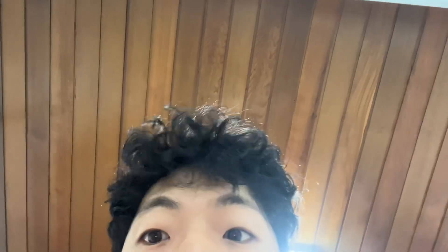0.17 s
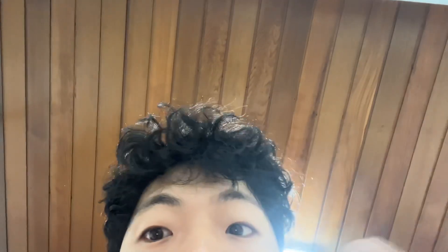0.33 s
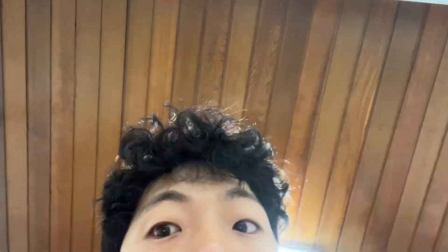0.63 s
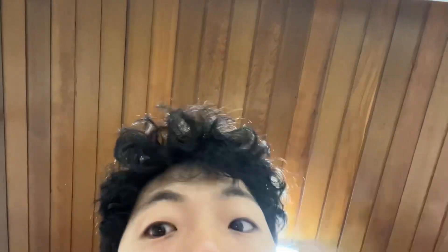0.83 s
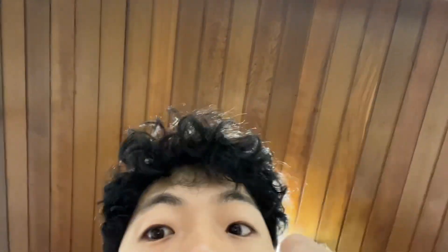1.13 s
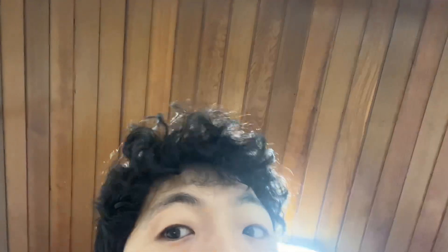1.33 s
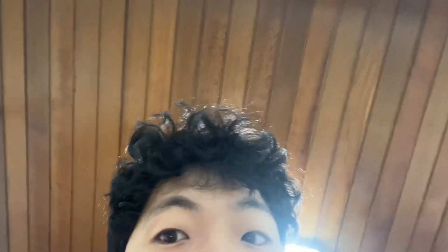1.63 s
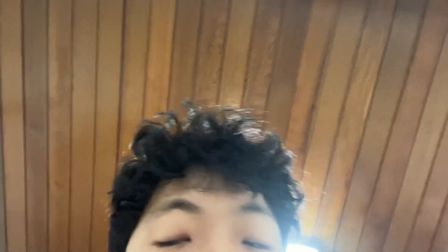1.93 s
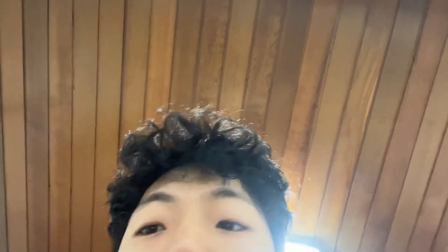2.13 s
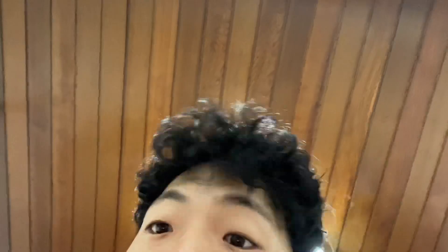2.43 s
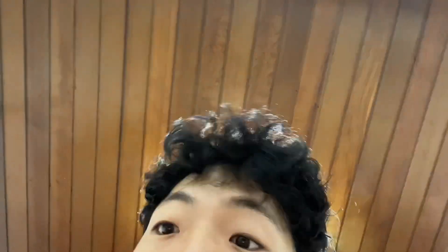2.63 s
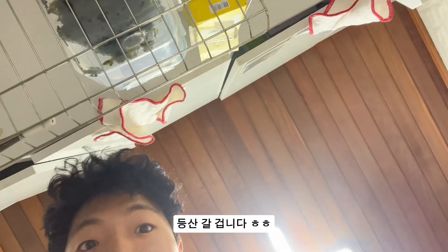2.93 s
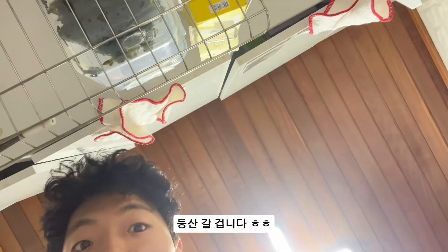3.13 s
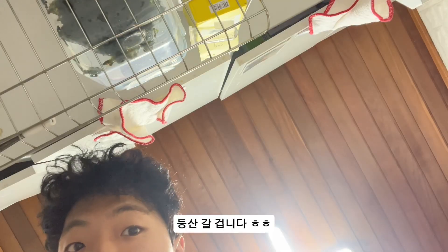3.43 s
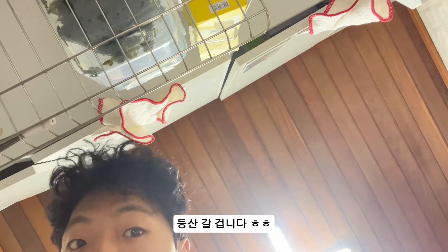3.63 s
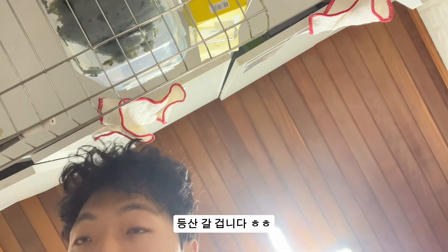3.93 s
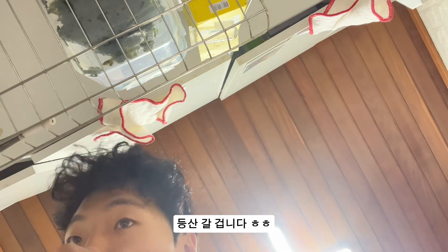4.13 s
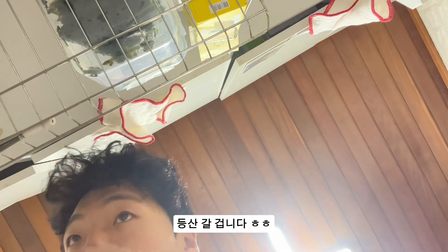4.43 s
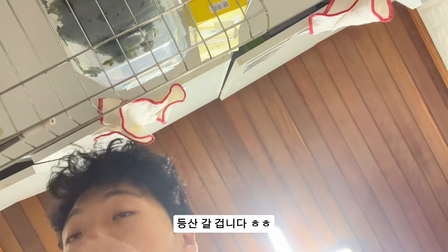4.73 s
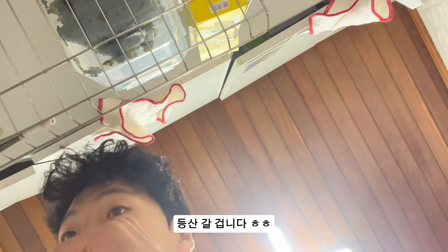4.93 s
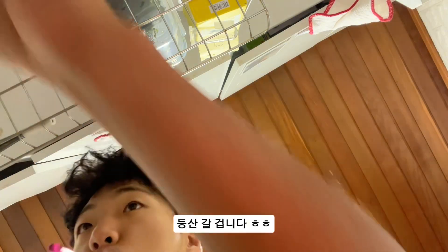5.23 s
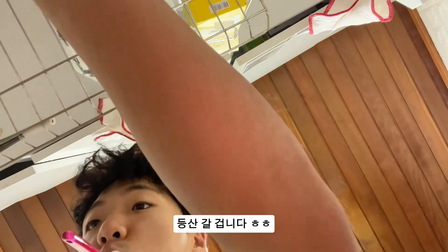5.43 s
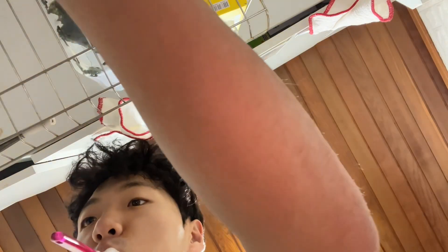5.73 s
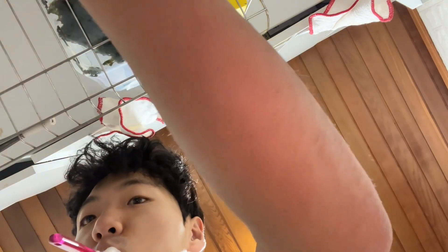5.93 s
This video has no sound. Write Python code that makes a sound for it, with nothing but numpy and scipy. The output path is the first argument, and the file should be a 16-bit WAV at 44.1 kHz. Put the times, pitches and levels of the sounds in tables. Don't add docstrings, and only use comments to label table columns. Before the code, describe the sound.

Soft quick tooth brushing with small clicks, an abrupt change to closer, boomier scrubbing, and finally a sudden burst of tap water drumming in a metal sink.

```python
import sys
import numpy as np
from scipy import signal
from scipy.fft import rfft, irfft, next_fast_len
from scipy.io import wavfile
from scipy.ndimage import uniform_filter1d, map_coordinates

SR = 44100
rng = np.random.default_rng(int(sys.argv[2]) if len(sys.argv) > 2 else 0)


def magnitude_from_level(level_db):
    exponent = np.asarray(level_db, float) / 20
    return 10 ** exponent


def generate_wav(sig):
    pcm = np.round(np.clip(np.atleast_2d(sig).T, -1, 1) * 32767).astype(np.int16)
    wavfile.write(sys.argv[1], SR, pcm)


N = 268128
CUT_S = 2.643

# [f/Hz, level/dB per Hz]
AIR_COLOUR_KITCHEN = [
    [(15, -26), (25, -14), (53, -6), (114, 1.5), (200, -17), (373, -7), (476, -17.5), (1400, -24.5), (2220, -21), (2690, -30.5), (6560, -36.5), (8360, -67), (11600, -45.5), (14000, -41), (16000, -44)],
    [(25, -49), (92, -16), (394, 3), (2280, -2), (4030, -15), (10100, -24), (16000, -76)],
]
AIR_COLOUR_SINK = [
    [(20, -25), (59, -23), (100, -1.5), (156, -5), (210, -20), (277, -2.5), (308, -13.5), (370, -12.5), (450, -24), (900, -27), (1400, -35.5), (1800, -32.5), (2500, -28.5), (4670, -39.5), (8280, -31.5), (9410, -37.5), (10200, -66), (12700, -66), (13800, -33.5), (16000, -36.5)],
    [(35, -38.5), (60, -10.5), (274, -20), (308, -14), (593, -33), (862, -23.5), (1310, -37.5), (10500, -37.5), (14600, -43), (16000, -72)],
]
# [f/Hz, level/dB rms, width/Hz]
FRIDGE_KITCHEN = [(61.2, -58, 8.68), (118.2, -63, 9.68), (290.5, -69, 14), (1975, -75.5, 45),
                  (2293, -74.5, 45), (3370, -78, 45)]
FRIDGE_SINK = [(48.3, -63.5, 22), (83.1, -56, 19), (151, -64, 4.6), (188.2, -62.5, 10), (280, -68.5, 18)]
# [t/s, level/dB]
FRIDGE_SWELL = [(2.6, -9.5), (3.2, -5.5), (3.45, 3), (4.8, 1.5), (5.3, -3.5), (5.6, -3), (6.1, 2.5)]
# [t/s, level/dB]
AIR_LEVEL_SINK = [(2.6, -4), (3.1, -1.5), (3.4, 1.5), (4.6, 1.5), (5.19, -0.5), (5.23, -2), (5.5, -1.5),
                  (5.63, -0.5), (5.72, 2), (6.1, -1)]
# [f/Hz, t60/s]
WALL_DECAY = [(150, 0.057), (1000, 0.76), (8000, 0.65)]
# [t/s, left-right level/dB, phase of side/rad]
MOUTH_PLACE = [(0, -0.7, -1.7), (1.9, -1, -1.7), (2.1, -0.6, 1.5), (2.8, -2, 1.6), (3.2, 0, 1.9),
               (3.5, -1.0, -1.9), (4.4, -0.5, -2.2), (4.6, 1, -1.7), (5.0, 1.1, 1.7), (6.1, 0, 1.3)]

# [start t/s, length/s, f/Hz, mid level/dB, side level/dB]
HOLLOWS = [(0.096, 0.16, 2087, -60, -55), (0.086, 0.16, 625, -59.5, -59), (0.092, 0.22, 280, -53.5, -71),
           (.1, 0.14, 3500, -61.5, -56), (2.73, 0.081, 720, -58, -53), (2.825, .09, 3390, -59.5, -58),
           (3.586, 0.15, 3200, -52.5, -52), (3.293, 0.16, 3180, -55.5, -55), (4.6, 0.76, 891, -72, -53),
           (4.872, 0.047, 1020, -65, -46), (5.58, 0.18, 2200, -71, -63), (5.588, 0.035, 14300, -56.5, -57),
           (5.723, .05, 985, -54, -41), (5.99, 0.056, 1300, -46.5, -39), (3.865, .17, 3250, -54.5, -53),
           (3.586, .12, 4600, -52.5, -54), (4.14, .1, 4500, -55, -54), (4.405, 0.11, 4700, -53, -52),
           (3.457, .03, 5000, -57, -59), (3.685, 0.033, 4000, -54.5, -58), (5.84, .24, 2950, -53, -50),
           (2.608, 0.038, 2900, -56.5, -55), (2.61, 0.053, 1700, -59, -58), (2.612, 0.044, 6400, -62, -61),
           (2.495, .06, 2150, -57, -60), (.09, 0.14, 420, -65.5, -66), (.1, .14, 1200, -73, -66),
           (3.296, 0.042, 3200, -55, -52), (.09, 0.14, 5100, -68, -65)]
# [start t/s, length/s, from f/Hz, to f/Hz, level/dB]
SLIDING_HOLLOWS = [(2.61, 0.21, 1700, 1910, -60), (2.7, .09, 750, 720, -58), (2.83, .08, 720, 700, -60),
                   (2.65, 0.049, 1350, 1300, -59), (2.64, .06, 1000, 990, -57),
                   (2.79, .18, 650, 1030, -60.5), (2.69, .1, 350, 345, -52.5), (2.71, 0.066, 484, 460, -56),
                   (2.82, 0.15, 600, 650, -58.5), (2.83, .1, 2500, 2660, -61),
                   (3.18, 0.11, 2330, 2300, -65), (3.14, 0.066, 3300, 3400, -71),
                   (2.715, 0.028, 680, 640, -51), (.2, 0.118, 2000, 2100, -69),
                   (0.086, 0.125, 7200, 6000, -70), (.1, 0.127, 2420, 2450, -59),
                   (.12, .08, 4500, 4400, -64), (5.04, 0.172, 2600, 2500, -64), (5.1, .11, 2000, 1950, -69),
                   (4.865, .04, 700, 700, -64), (5.72, 0.062, 1000, 960, -47),
                   (5.82, 0.051, 1100, 1200, -51), (5.655, 0.046, 720, 730, -63),
                   (5.2, 0.036, 1150, 1150, -66), (5.93, 0.12, 1370, 1370, -48),
                   (5.97, .11, 2090, 2090, -52), (5.87, .05, 2620, 2680, -50), (5.88, .05, 1850, 1850, -47),
                   (5.83, 0.3, 3280, 3270, -50), (5.72, 0.077, 2300, 2300, -54)]

# [t/s, spray level/dB]
TAP_FLOW = [
    (5.57, -78),
    (5.594, -63.5),
    (5.638, -68),
    (5.663, -50.5),
    (5.705, -52),
    (5.729, -36),
    (5.808, -39),
    (5.87, -36.5),
    (6.08, -36.5),
]
# [t/s, spray level/dB, smack level/dB, smack f/Hz]
GOBS = [
    (5.709, -35, -29, 6700),
    (5.7095, -40, -32.5, 4300),
    (5.726, -23.5, -20.5, 2430),
    (5.7685, -24.5, -24, 2290),
    (5.886, -24.5, -27, 8200),
    (5.9, -30, -31, 2600),
    (5.998, -31, -25, 1200),
]
# [f/Hz, level/dB per Hz]
SPRAY_COLOUR = [
    [(760, -50), (1300, -14.5), (1670, -18.5), (2030, -2.5), (2630, -1), (3580, -10), (4170, -6), (5540, -9.5), (6620, -5), (9000, -11), (10000, -21.5), (13700, -26.5), (16000, -12)],
    [(760, -36), (1450, -9), (1920, -11.5), (2950, -4.5), (3560, -11), (5960, -6.5), (10500, -7.5), (14400, -22), (16000, -81.5)],
]
BASIN_COLOUR = [
    [(120, -57), (200, -21), (274, -7.5), (620, -12), (738, -4.5), (833, -14), (925, -0.5), (1600, -8.5), (2080, -31), (2600, -64)],
    [(120, -60), (200, -22), (512, -24), (917, -2.5), (1160, -7), (1280, -13), (1600, -14), (2300, -55)],
]
# [f/Hz, mid level/dB, side level/dB, width/Hz]
BASIN_MODES = [(942, -46.5, -36, 21.7), (1030, -50.5, -42.5, 25.9), (1153, -54, -45, 29.8),
               (1360, -50.5, -49, 24.1), (2082, -50.5, -53, 36.2), (2200, -52, -54, 41),
               (2360, -50.5, -52, 26.3), (2562, -51.5, -51, 29.5), (2660, -49.5, -51, 23.9),
               (2968, -54, -48, 40), (3150, -55, -49, 40), (4180, -53, -51, 50)]

# [t/s, peak level/dB, ring f/Hz, knock level/dB]
HEAD_CLICKS = [(0.363, -35, 3380, -25), (0.3673, -30.5, 3460, -21.5), (0.6002, -27.5, 3345, -28),
               (0.617, -39.5, 3460, -12), (0.826, -26, 3490, -28), (0.843, -34.5, 3460, -8.5),
               (1.2842, -56, 900, 5), (1.311, -49.5, 6130, -11), (1.3416, -47, 950, -7),
               (1.476, -45, 5340, -3), (1.492, -42, 5740, -1), (1.8371, -58, 3760, 10.5),
               (2.002, -43, 2650, -19), (2.124, -46.5, 1960, -14), (2.5739, -46, 2500, -6),
               (2.609, -49, 2800, -13), (4.99, -46.5, 2860, -6), (4.997, -48, 2400, -6),
               (0.1408, -47, 4270, -2), (0.177, -48, 3840, -7), (2.163, -54, 1290, -3),
               (2.205, -54.5, 1800, -12)]
# [t/s, f/Hz, level/dB]
BRISTLE_SQUEAK = [
    (.872, 10900, -80),
    (.9, 12700, -75),
    (.94, 13500, -80),
    (1.0, 14100, -72),
    (1.065, 14400, -67),
    (1.11, 13500, -66),
    (1.175, 12900, -70),
    (1.225, 13400, -71),
    (1.275, 11300, -78),
]
# [peak t/s, pressure level/dB, speed level/dB]
KITCHEN_STROKES = [(0.12, -54.5, -72), (.16, -57.5, -82), (.215, -59.5, -82), (0.274, -67, -68.5),
                   (0.356, -58.5, -66), (0.519, -65.5, -66), (0.593, -58.5, -71), (.73, -71, -67),
                   (.81, -58, -67.5), (0.932, -63.5, -64.5), (1.039, -64, -60.5), (1.15, -66.5, -65),
                   (1.29, -64, -71), (1.385, -70, -72), (1.49, -59.5, -79), (1.56, -97, -80),
                   (1.749, -60, -68), (1.84, -65, -74), (1.999, -59.5, -72), (2.11, -72, -99),
                   (2.269, -62.5, -67), (2.399, -64, -72), (2.508, -53.5, -62), (2.623, -51.5, -59.5)]
# [peak t/s, fall/s, rasp level/dB, cheek level/dB]
SINK_RUBS = [
    (2.655, 0.017, -55, -50.5),
    (2.734, 0.053, -49.5, -45.5),
    (2.855, 0.086, -51, -52),
    (3.245, 0.019, -57, -58),
    (3.17, 0.034, -69, -66),
    (4.12, 0.015, -57, -53),
    (4.225, 0.01, -72, -55),
    (4.3, 0.011, -63, -57),
    (4.5, 0.024, -65, -48),
]
# [middle t/s, half length/s, rasp level/dB, cheek level/dB]
DRY_RUBS = [
    (4.578, 0.022, -54.5, -68),
    (4.73, 0.016, -57.5, -62.5),
    (4.79, 0.036, -56, -62.5),
    (4.878, 0.02, -59.5, -58.5),
    (4.997, .011, -69, -63),
    (5.13, 0.082, -55, -65),
]
# [t/s, peak level/dB, jaw boom level/dB, cheek level/dB, t60/s]
HARD_STROKES = [
    (3.2964, -29.5, -5.5, -18, 0.45),
    (3.584, -26, -13, -14, 0.53),
    (3.861, -24.5, -10.5, -11.5, 0.42),
    (4.136, -26, -11, -9.5, 0.53),
    (4.4004, -25.5, -8.5, -7.5, 0.46),
]
# [t/s, peak level/dB, jaw boom level/dB, cheek level/dB, t60/s]
HARD_FLICKS = [
    (3.4535, -28, -27, -5.5, 0.043),
    (3.461, -32, -27, -7.5, 0.083),
    (3.4971, -25, -17, -6, 0.048),
    (3.51, -20.5, -16.5, -20, 0.056),
    (3.599, -25, -20, -13, 0.04),
    (3.683, -26, -9, -22, 0.045),
]
# [f/Hz, level/dB per Hz]
RASP_COLOUR_KITCHEN = [
    [(590, -13), (1000, -4), (1570, -9), (2050, -2.5), (2800, -6.5), (3500, -9), (4950, -14.5), (5950, -12), (8290, -22), (11700, -36)],
    [(350, -31), (600, -26), (1080, -10), (1750, -23), (1990, -10), (3370, -13), (6920, -33), (8390, -23), (11000, -38), (13000, -30)],
]
TIP_COLOUR = [
    [(10000, -2), (10500, -8.5), (13000, -9.5), (16000, -12)],
    [(5000, -31), (7000, -11), (10000, -6), (14000, -23)],
]
RASP_COLOUR_SINK = [
    [(590, -1), (1000, -6.5), (1610, -8.5), (2290, -4.5), (3330, -2.5), (4120, -4.5), (6640, -7), (9000, -14.5), (10000, -27), (13500, -26), (16000, -26.5)],
    [(590, -28), (1000, -9), (1370, -13), (1630, -8), (3300, -6.5), (8260, -11.5), (13000, -23), (16000, -53)],
]
DRY_COLOUR = [
    [(880, -28), (1670, -11), (2650, 1.5), (3860, -8), (6370, -0.5), (9000, -7), (13500, -15), (16000, -15)],
    [(880, -50), (1500, -10.5), (2750, -8), (4770, -11), (6240, -2), (10800, -7.5), (15000, -25)],
]
RUB_COLOUR = [
    [(150, -20.5), (250, -14), (332, -8), (413, -23), (455, -7.5), (566, -16.5), (741, -9), (1500, -28.5), (2600, -71)],
    [(150, -33), (250, -1.5), (419, -6), (566, 2), (793, 5.5), (1500, -14), (1950, -57)],
]
CHEEK_COLOUR = [
    [(79, -15), (135, -2.5), (185, 6), (281, 1.5), (440, 0), (558, -4.5), (771, -4.5), (1040, -13.5), (1400, -56)],
    [(79, -43), (135, -18), (404, -17.5), (506, -3.5), (580, -23), (727, -6.5), (1400, -30.5), (1820, -55)],
]
# [f/Hz, level/dB, t60/s]
CHEEK_RINGS = [(187, -1, 0.44), (269.6, -4.5, 0.28), (336.9, -1.5, 0.35), (458.5, 1, 0.24),
               (698, -9.5, 0.2), (798, -9.5, 0.35)]

# [mid low f/Hz, mid high f/Hz, wander/Hz, side top f/Hz]
LOST_BANDS = [
    (7850, 10430, 450, 12300),
    (9180, 13650, 300, 16000),
]
FULL_BAND_S = [.11, .345, .365, .525, .6, .68, .825, 1.48, 2.26, 2.52, 3.505, 5.21, 5.72]


def unit(x):
    return x / np.sqrt(np.mean(x ** 2) + 1e-20)


def along(points, hz):
    f, v = np.transpose(points)
    return np.interp(np.log(hz + 1), np.log(f + 1), v)


def curves(rows, outside=-120):
    s, *cols = np.transpose(rows)
    return [np.interp(np.arange(N) / SR, s, c, outside, outside) for c in cols]


def wobble(rate):
    at = np.arange(0, N + 16, 16)
    knots = rng.standard_normal(int(N * rate / SR) + 4)
    return np.interp(np.arange(N), at, map_coordinates(knots, [at * rate / SR]))


def coloured(pair, colours, side_db, lean=0.75, turn=-1.77):
    m = next_fast_len(N + SR // 4)
    hz = np.fft.rfftfreq(m, 1 / SR)
    a, b = rfft(pair, m)
    share = lean / (1 + (hz / 2500) ** 2)
    related = share * np.exp(1j * turn) * a + np.sqrt(1 - share ** 2) * b
    gains = [magnitude_from_level(along(c, hz)) * (hz >= c[0][0]) * (hz <= c[-1][0]) for c in colours]
    mid, side = irfft([a, related] * np.array(gains), m)[:, :N]
    return np.array([unit(mid), magnitude_from_level(side_db) * unit(side)])


def grains(per_s, spread_db, patchy_db):
    cell = (np.arange(N) * per_s / SR).astype(int)
    snap_db = spread_db * np.minimum(rng.exponential(size=N), 3.5)[cell]
    z = signal.stft(magnitude_from_level(snap_db) * rng.standard_normal((2, N)), nperseg=512)[2]
    field = uniform_filter1d(rng.standard_normal(z.shape[1:]), size=3, axis=0)
    field = uniform_filter1d(field, size=8, axis=1)
    return signal.istft(z * magnitude_from_level(patchy_db * unit(field)), nperseg=512)[1][:, :N]


def ring(hz, t60, t):
    return magnitude_from_level(-60 * t / t60) * np.sin(2 * np.pi * hz * t)


def singing(width, t):
    knots = rng.standard_normal((2, 500))
    return [map_coordinates(k, [(t - t[0]) * min(width, 900)]) for k in knots]


def narrow(hz, width, t):
    re, im = singing(width, t)
    return unit(re * np.cos(2 * np.pi * hz * t) + im * np.sin(2 * np.pi * hz * t))


def hollow(hz, width, t, start):
    re, im = singing(width, t)
    turn = np.interp(start, *np.transpose(MOUTH_PLACE)[[0, 2]])
    port_phase = np.array([[0], [turn]])
    mid, side = np.real((re + 1j * im) * np.exp(2j * np.pi * hz * t + 1j * port_phase))
    return np.array([unit(mid), unit(unit(side) + 0.41 * narrow(hz, width, t))])


def swells(peak_s, db, rise, fall, front, tail):
    out, span = np.zeros(N + 2 * SR), np.arange(-SR // 8, SR // 2) / SR
    for s, gain, r, f in np.broadcast(peak_s, magnitude_from_level(db), rise, fall):
        fade = np.where(span < 0, np.abs(span / r) ** front, np.abs(span / f) ** tail)
        out[round(s * SR) + SR - SR // 8:][:len(span)] += gain * np.exp(-fade)
    return out[SR:SR + N]


def walls(x):
    hz, t, z = signal.stft(rng.standard_normal((2, SR // 2)), SR, nperseg=256)
    tail = signal.istft(z * magnitude_from_level(-60 * t / along(WALL_DECAY, hz)[:, None]), SR, nperseg=256)[1]
    late = np.pad(x, ((0, 0), (300, 0)))
    return signal.fftconvolve(late, tail / np.linalg.norm(tail[0]), axes=1)[:, :N]


def kitchen(colours, hum, level_db, side_db, swell_db=0, air_db=0):
    air_gain = magnitude_from_level(level_db + air_db + 1.3 * wobble(3.165))
    air = air_gain * coloured(grains(200, 0.6, patchy_db=2.5), colours, side_db)
    t = np.arange(N) / SR
    for hz, db, width in hum:
        fuzz = unit(40 / (30 + width) + wobble(width) + 1j * wobble(width))
        line = unit(np.real(fuzz * np.exp(2j * np.pi * hz * t)))
        air[0] += magnitude_from_level(db + swell_db + 1.4 * wobble(9.6)) * line
    return air


def cavity():
    out = np.zeros((2, N))
    for start, length, hz, *levels in HOLLOWS:
        t = np.arange(round(length * SR)) / SR
        u = t / length
        shape = np.sin(np.pi * u ** 0.38) * (1.25 - 0.6 * u)
        pair = magnitude_from_level(np.array(levels)[:, None] + 3.5) * hollow(hz, hz / 8.5, t, start)
        part = out[:, round(start * SR):][:, :len(t)]
        part += (shape * pair)[:, :part.shape[1]]
    return out


def glides():
    out = np.zeros((2, N))
    for start, length, from_hz, to_hz, db in SLIDING_HOLLOWS:
        t = np.arange(round(length * SR)) / SR
        warped = t + (to_hz / from_hz - 1) * t ** 2 / (2 * length)
        pair = magnitude_from_level([[db], [db - 1]]) * hollow(from_hz, from_hz / 16, warped, start)
        shape = np.sqrt(np.abs(np.sin(np.pi * t / length)))
        part = out[:, round(start * SR):][:, :len(t)]
        part += (shape * pair)[:, :part.shape[1]]
    return out


def steel(flow_db):
    out, t = np.zeros((2, N)), np.arange(SR // 2) / SR
    for hz, mid_db, side_db, width in BASIN_MODES:
        out[:, -len(t):] += magnitude_from_level([[mid_db], [side_db]]) * hollow(hz, width, t, 6)
    return out * magnitude_from_level(flow_db - 2.0)


def smacks():
    out, t = np.zeros((2, N + SR)), np.arange(SR // 30) / SR
    for s, _, db, hz in GOBS:
        shape = magnitude_from_level(db - 1.5 - 60 * t / 0.015) * (1 - np.exp(-t / 0.0003))
        pair = np.array([narrow(hz, 820, t), 0.9 * narrow(hz, 800, t)])
        out[:, round(s * SR):][:, :len(t)] += shape * pair
    return out[:, :N]


def tap():
    spray_db, = curves(TAP_FLOW + [(7, TAP_FLOW[-1][1])])
    t, burst = np.arange(N) / SR, np.zeros(N)
    for s, db, _, _ in GOBS:
        burst += magnitude_from_level(db - 11.0 - 60 * np.abs(t - s) / 0.043) * (t >= s)
    surge_db = 2 * wobble(32)
    flow_db = spray_db + 35.5
    basin_db = -42.5 + 1.4 * flow_db + 1.3 * surge_db
    spray = coloured(grains(1200, 2.3, patchy_db=1.5), SPRAY_COLOUR, side_db=2.0, lean=1.0, turn=1.4)
    basin = coloured(grains(200, 1.15, patchy_db=0.0), BASIN_COLOUR, side_db=9, lean=0.79, turn=0.46)
    return (steel(1.6 * flow_db + 0.77 * surge_db)
            + (magnitude_from_level(spray_db + 0.54 * surge_db) + burst) * spray
            + (magnitude_from_level(basin_db) + 0.15 * burst) * basin)


def clicks():
    out, t = np.zeros((2, N + SR)), np.arange(SR // 20) / SR
    for s, db, hz, knock_db in HEAD_CLICKS:
        luck = rng.standard_normal((2, len(t)))
        tick = 1.2 * magnitude_from_level(-60 * t / 0.003) * uniform_filter1d(luck, size=6)
        rough = uniform_filter1d(luck[::-1], size=30)
        after = 0.65 * magnitude_from_level(-60 * t / 0.07) * rough * np.sin(2 * np.pi * hz * t)
        ports = hz * np.array([[1], [0.87]])
        shell = ring(ports, 0.0078, t) + 0.45 * ring(1.13 * ports, 0.0032, t)
        shell = shell * (1 - np.exp(-t / 0.0001)) * [[1.6], [1.4]]
        jaw_hz = 307 * np.exp(-0.0081 * (db + knock_db + 58.5))
        knock = ring(jaw_hz, 0.03, t) * (1 - np.exp(-t / 0.0011)) * [[3.5], [1.2]]
        out[:, round(s * SR):][:, :len(t)] += magnitude_from_level(db) * (shell + after + tick + magnitude_from_level(knock_db) * knock)
    return out[:, :N]


def gulps():
    out, t = np.zeros((2, N)), np.arange(SR // 4) / SR

    def mode(hz, db, t60):
        steady = np.sin(2 * np.pi * (hz * t + rng.random())) + 0.55 * narrow(hz, 38.3, t)
        return magnitude_from_level(db - 3.5 - 60 * t / t60) * steady

    hz = 440 + 190 * np.exp(-(t / 0.025) ** 3.2)
    shape = (1 - np.exp(-t / 0.016)) * magnitude_from_level(-60 * t / 0.25)
    for s, db, _, cheek_db, _ in HARD_STROKES:
        for port, (port_db, mode_gain) in enumerate([(2.5, 1.2), (0.3, 0.6)]):
            rough = 1.08 + 0.62 * narrow(60.8, 79.0, t)
            drop = shape * rough * np.sin(2 * np.pi * np.cumsum(hz) / SR + 2.5 * port)
            modes = sum(mode(*row) for row in CHEEK_RINGS) * (1 - np.exp(-t / 0.015)) ** 2
            gulp = magnitude_from_level(db + cheek_db + port_db) * (drop + mode_gain * modes)
            out[port, round((s - 0.005) * SR):][:len(t)] += gulp
    return out


def light(rows, longest_rise, front, tail):
    s, fall, *levels = np.transpose(rows)
    return [swells(s, db, np.minimum(longest_rise, fall), fall, front, tail) for db in levels]


def scrub_first():
    s, pressure_db, speed_db = np.transpose(KITCHEN_STROKES)

    def swish(db):
        return swells(s, db, rise=0.026, fall=0.038, front=1.44, tail=1.37)

    rasp = coloured(grains(900, 2.3, patchy_db=2.5), RASP_COLOUR_KITCHEN, side_db=0.5)
    rasp *= swish(pressure_db) + magnitude_from_level(-73.5)
    cheek = coloured(grains(150, 2.8, patchy_db=0), CHEEK_COLOUR, side_db=-5.0)
    cheek *= swish(-57 + 0.48 * (pressure_db + 62))
    tips = swish(speed_db) * coloured(grains(1500, 0.93, patchy_db=0), TIP_COLOUR, side_db=3.5)
    hz, db = curves(BRISTLE_SQUEAK)
    tips[0] += magnitude_from_level(db + 3.7 * wobble(45.2)) * np.sin(2 * np.pi * np.cumsum(hz) / SR)
    return rasp + cheek + tips


def scrub_sink():
    t, jaw, cheek = np.arange(N) / SR, np.zeros(N), np.zeros(N)
    rasp, rub = light(SINK_RUBS, 0.036, front=1.6, tail=0.95)
    dry_rasp, late_rub = light(DRY_RUBS, 1, front=6, tail=6)
    dry_rasp += magnitude_from_level(-70.5) * (t > DRY_RUBS[0][0]) * (t < DRY_RUBS[-1][0])
    rows = [(*row, 0.0053) for row in HARD_STROKES] + [(*row, 0.0015) for row in HARD_FLICKS]  # rise, s
    for s, db, jaw_db, cheek_db, t60, rise in rows:
        u = np.clip(t - s, 0, None)
        bite = (1 - np.exp(-u / rise)) ** 2
        rasp += magnitude_from_level(db - 14 - 60 * u / t60) * bite
        cheek += magnitude_from_level(db + cheek_db - 5.5 - 55 * u / t60) * bite ** 1.3
        jaw += magnitude_from_level(db + jaw_db - 4 - 45 * u / t60) * bite ** 3.4
    deep = [[(hz, db - 30 * np.log2(max(hz / 350, 1))) for hz, db in c] for c in CHEEK_COLOUR]
    bright = [[(hz, db - 30 * np.log2(max(330 / hz, 1))) for hz, db in c] for c in CHEEK_COLOUR]
    rasp_noise = coloured(grains(1400, 1.8, patchy_db=2.5), RASP_COLOUR_SINK, 0.5, lean=0.81, turn=-2.3)
    dry_noise = coloured(grains(970, 0.87, patchy_db=3.0), DRY_COLOUR, side_db=2, lean=0.31)
    rub_noise = coloured(grains(150, 0.63, patchy_db=1.5), RUB_COLOUR, side_db=2.0, lean=0.7, turn=1.46)
    jaw_noise = coloured(grains(60, 0.21, patchy_db=0), deep, side_db=-4.0, lean=0.89, turn=0.027)
    cheek_noise = coloured(grains(120, 1.2, patchy_db=0), bright, side_db=2.5, lean=0.7, turn=-1.94)
    return (rasp * rasp_noise + magnitude_from_level(0.5) * dry_rasp * dry_noise + (rub + late_rub) * rub_noise
            + jaw * jaw_noise + cheek * cheek_noise)


def scene():
    after = np.clip((np.arange(N) / SR - CUT_S) / 0.004, 0, 1)
    swell_db, air_db = curves(FRIDGE_SWELL)[0], curves(AIR_LEVEL_SINK)[0]
    hits = clicks()
    first = kitchen(AIR_COLOUR_KITCHEN, FRIDGE_KITCHEN, level_db=-55.5, side_db=-3.0) + scrub_first()
    near = scrub_sink() + gulps() + tap() + smacks()
    sink = kitchen(AIR_COLOUR_SINK, FRIDGE_SINK, -55.5, -2.5, swell_db, air_db)
    sink += near + magnitude_from_level(-10) * walls(near)
    takes = first * (1 - after) + sink * after
    mid, side = takes + cavity() + glides() + hits + magnitude_from_level(-19.0) * walls(hits)
    left_right_db = curves(MOUTH_PLACE, outside=0)[0]
    return np.array([mid + side, mid - side]) * magnitude_from_level(left_right_db * [[0.5], [-0.5]])


def thin_treble(mid, side):
    hz, t, z = signal.stft([mid, side], SR, nperseg=1024)
    by_sink = t > CUT_S
    lo, hi, wander, top = np.transpose(LOST_BANDS)[:, (t > CUT_S + 0.03).astype(int)]
    jog = rng.standard_normal((3, len(t) // 3 + 1)).repeat(3, axis=1)[:, :len(t)]
    calm = np.abs(t[:, None] - FULL_BAND_S).min(axis=1) > 0.011
    f = hz[:, None]
    cells = rng.random((len(hz) // 12 + 1, len(t) // 3 + 1))
    cells = cells.repeat(12, axis=0).repeat(3, axis=1)[:len(hz), :len(t)]
    band = (f > lo + wander * jog[0]) & (f < hi + wander * jog[1])
    scattered = (f > hi) & (cells < 0.12 + 0.3 * by_sink)
    z[0] *= 1 - calm * (band | scattered | (f > 15950))
    z[1] *= 1 - calm * (f > top + 2 * wander * jog[2])
    return signal.istft(z, SR, nperseg=1024)[1][:, :N]


def top_cut(x):
    return signal.sosfilt(signal.butter(12, 16460, fs=SR, output="sos"), x)


def record(dry):
    mid, side = thin_treble((dry[0] + dry[1]) / 2, (dry[0] - dry[1]) / 2)
    return top_cut(np.array([mid + side, mid - side]))


dry = scene()
out = record(dry)
generate_wav(out)
```